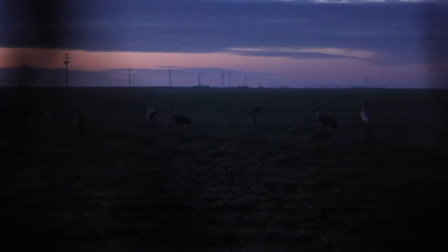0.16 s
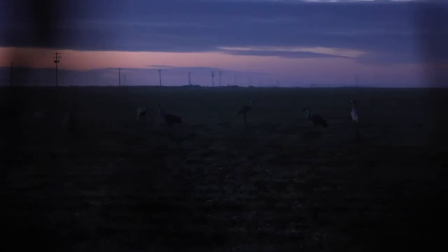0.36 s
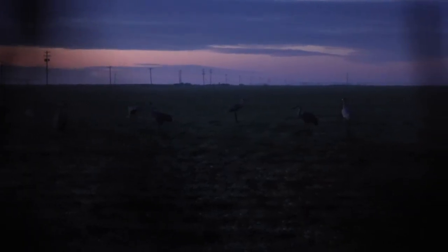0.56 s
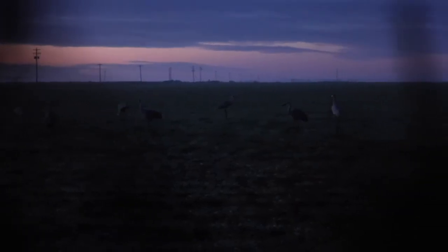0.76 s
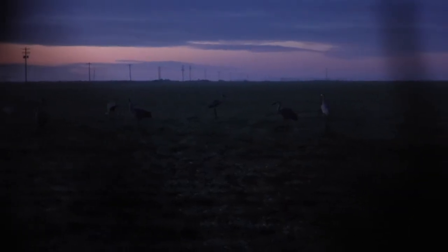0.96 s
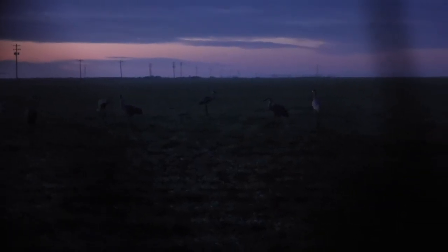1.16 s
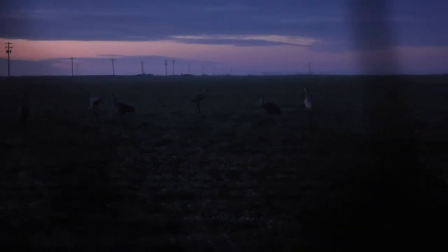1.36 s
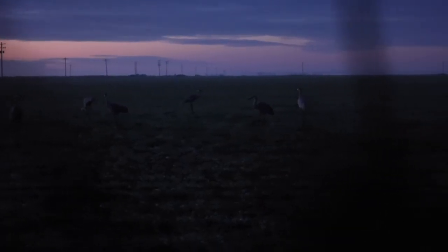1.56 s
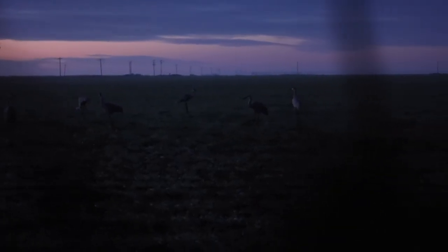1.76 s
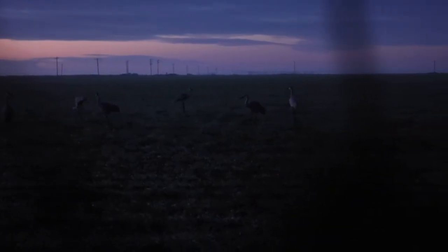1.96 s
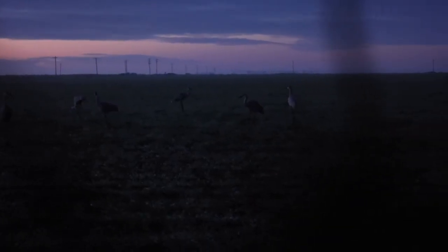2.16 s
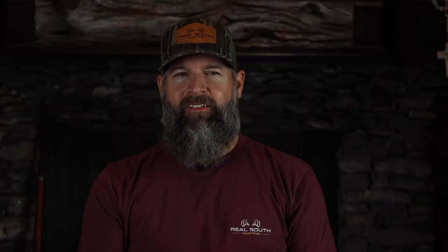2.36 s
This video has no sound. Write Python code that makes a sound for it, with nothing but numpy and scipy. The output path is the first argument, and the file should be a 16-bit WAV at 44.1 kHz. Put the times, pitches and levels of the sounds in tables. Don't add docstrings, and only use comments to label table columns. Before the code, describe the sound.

Cranes close by give short, reedy rattling calls in bursts over a quiet open field

```python
import sys
import numpy as np
from scipy import signal
from scipy.io import wavfile
from scipy.ndimage import uniform_filter1d, minimum_filter1d

SR = 44100
rng = np.random.default_rng(int(sys.argv[2]) if len(sys.argv) > 2 else 0)


def waveform_to_disk(signal):
    frames = np.transpose(np.atleast_2d(signal))
    scaled = np.clip(frames, -1, 1) * 32767
    samples = np.round(scaled).astype(np.int16)
    wavfile.write(sys.argv[1], SR, samples)


def voltage_ratio(decibels):
    exponent = np.asarray(decibels, float) / 20
    return 10 ** exponent


N = 105707
T = np.arange(N) / SR


def rms_one(x):
    return x / np.sqrt(np.mean(x ** 2) + 1e-20)


def white_noise():
    return rng.standard_normal(N)


def lowpass(x, order, hz):
    return signal.sosfilt(signal.butter(order, hz, fs=SR, output="sos"), x)


def curve(rows):
    s, db = np.transpose(rows)
    return voltage_ratio(np.interp(T, [s[0] - .03, *s, s[-1] + .03], [-110, *db, -110]))


def drift(rate_hz):
    r = np.exp(-2 * np.pi * rate_hz / SR)
    run_in = int(SR / rate_hz)
    wander = signal.lfilter([1], [1, -2 * r, r * r], rng.standard_normal(N + run_in))
    return rms_one(wander[run_in:])


def resonate(x, peaks, order=1):
    out = 0
    for k, (hz, width, db) in enumerate(peaks):
        r = np.exp(-np.pi * width / SR)
        top, bottom = [(1 - r * r) / 2, 0, (r * r - 1) / 2], [1, -2 * r * np.cos(2 * np.pi * hz / SR), r * r]
        y = x + 1e-18
        for _ in range(order):
            y = signal.lfilter(top, bottom, y)
        out = out + y * voltage_ratio(db) * (-1) ** k
    return out


# (time [s], length [s], first pitch [Hz], last pitch [Hz], level [dB])
PULSES = [(-.016, 0.016, 970, 790, -18.5), (0.0354, 0.024, 1061, 800, -23.5),
          (0.089, 0.018, 1063, 800, -18), (.786, 0.014, 824, 765, -19), (0.822, 0.028, 879.4, 780, -26),
          (0.877, 0.025, 856.8, 735, -26), (1.0839, 0.00938, 904, 790, -19), (1.653, 0.013, 773, 712, -21),
          (1.693, 0.018, 764.2, 713, -24), (1.8921, 0.0095, 874.4, 785, -18.5),
          (2.005, 0.018, 1000, 730, -14), (2.048, 0.013, 897, 812, -20.5),
          (2.091, 0.01782, 931.3, 745, -19.5), (2.136, 0.012, 640, 590, -31),
          (2.17, 0.014, 1029, 785, -18.5), (2.218, 0.017, 1058, 790, -20.5), (2.266, 0.019, 1161, 800, -20),
          (2.312, 0.018, 1089, 795, -18.5), (2.361, .020, 1039, 795, -23.5)]


def pulses():
    pulse = np.searchsorted(np.array(PULSES)[:, 0], T) - 1
    start, length, first_hz, last_hz, db = np.transpose(PULSES)[:, pulse]
    age = T - start
    return pulse, age, length, first_hz, last_hz, db, np.clip(age / length, 0, 1)


def breath(order, release_s=0.0028):
    _, age, length, _, _, db, done = pulses()
    late_s = .0016 * (np.sqrt(min(order, 5)) - 1)
    attack = np.clip((age - late_s) / 0.0028, 0, 1) ** 2
    release = np.exp(-np.clip(age - length, 0, 1) * np.sqrt(order) / release_s)
    return voltage_ratio(db - 4 * done) * attack * release


# (favoured pitch [Hz], boost [dB], hollow pitch [Hz], pitch hold [power],
# settling [power])
THROAT = [(2460, 9, 3200, 0.58, 1.6), (4340, 8.5, 3650, 2.1, 2.128), (4260, 14.5, 3460, 2.8, 2.353),
          (3383, 21.5, 3900, 1.416, 1.115), (3309, 15, 6366, 2.163, 1.153), (4210, 16, 3980, 5.15, 1.468),
          (4200, 15, 4200, 1.116, 2.01), (3560, 12.5, 3400, 1.024, 1.3), (3387, 15, 6900, 1.323, 1.634),
          (3360, 15, 2700, 1.184, 2.2), (3360, 11, 2280, 1.5, 1.303), (2532, 14, 3160, 1.124, 1.99),
          (3525, 14, 6060, 2.52, 1.264), (2260, 14.5, 6000, 1.025, 1.94), (2390, 6.5, 2570, 1.132, 3.05),
          (2789, 10, 2400, 2.3, 2.66), (3060, 7.5, 3550, 1.4, 2.1), (4600, -0.5, 3604, 1.2, 2.195),
          (3020, 8, 4040, 1.8, 2.09)]


def sagging_pitch():
    pulse, age, _, first_hz, last_hz, _, done = pulses()
    _, _, _, hold, settle = np.transpose(THROAT)[:, pulse]
    sag = (1 - done ** np.abs(hold)) ** np.abs(settle)
    scoop = 1 + .15 * np.exp(-np.abs(age) / .0015)
    return last_hz * (first_hz / last_hz) ** sag * scoop


# (from time [s], fundamental [dB], brass band [dB], top [dB], rasp [dB])
MANNER = [
    (-.1, -8, -3, -5, -9.5),
    (.75, -7.5, 4, -3, -9),
    (1.05, -1, -9, -4, -7.5),
    (1.6, -6, -3, -12, -26),
    (1.85, -3.5, -6, -6, -10),
    (1.98, -1.5, 2, -5.5, -4.5),
    (2.2, -2.5, -0.5, -2, -10.5),
]
BRASS_HZ, TOP_HZ = 3000, 4340


def manner():
    starts, *colours = np.transpose(MANNER)
    call = np.searchsorted(starts, T) - 1
    return call, *(colour[call] for colour in colours)


RASP_TOP_DB = [5.5, -4.5, 2.6, -8.5, -5.5, -1.17, 1.2]


def rasp(phase):
    *_, done = pulses()
    call, _, _, top_db, rasp_db = manner()
    chopped = white_noise() * (1 + np.cos(phase)) / 2
    noise = voltage_ratio(rasp_db + 8 * done + 9.5) * chopped * breath(order=3)
    dull = lowpass(noise, 4, TOP_HZ)
    return dull + (noise - dull) * voltage_ratio(top_db + np.array(RASP_TOP_DB)[call])


ORDER_DB = [6.5, 3.5, 0, -12.5, -1.5, 0]
# (second harmonic [dB], third harmonic [dB], change of low harmonics [dB],
# low puff [dB])
EFFORT = [(-8, -2, 3.5, 18), (-2.5, 1, -0.5, 2.7), (-2, 4, -3, -7), (3.4, -3.5, 1.8, -10),
          (0.3, -7.5, 1.7, -15), (2.5, 0.5, -2.5, -5), (4.5, 3.5, -6, 11), (2.5, 0.5, -3.5, -8),
          (8, 8.6, -12.5, -15), (-4, -2, -4.5, 3), (4, 2, -4.5, -2.5), (0.5, -10.3, -5, 6.5),
          (-2.5, 1, -1, 1.5), (8, 8, 0, 18), (3.9, 4.8, -6, 7.5), (1.5, 7.3, -2, 4.5), (0.6, -1.7, -2, 1.5),
          (-2, 1.5, -4, 1.5), (-4, -6, 1.5, 3)]


def reed_harmonics(pitch, phase):
    pulse, *_, done = pulses()
    _, low_db, brass_db, top_db, _ = manner()
    mouth_hz, mouth_db, hollow_hz, _, _ = np.transpose(THROAT)[:, pulse]
    second_db, third_db, fade_db, _ = np.transpose(EFFORT)[:, pulse]
    out = 0
    for k, order_db in enumerate(ORDER_DB + [0] * 12, start=1):
        hz = k * pitch
        above_brass = 1 / (1 + (BRASS_HZ / hz) ** 20)
        above_top = 1 / (1 + (TOP_HZ / hz) ** 20)
        colour_db = order_db - 3 * np.log2(k)
        colour_db = colour_db + (above_brass - above_top) * brass_db + above_top * top_db
        colour_db += 1.1 * np.sqrt(k) * drift(47.3)
        colour_db += mouth_db * np.exp(-((hz - mouth_hz) / 300) ** 2)
        colour_db += -11.5 * np.exp(-((hz - hollow_hz) / 440) ** 2)
        colour_db += (k == 1) * low_db + (k == 2) * second_db + (k == 3) * third_db
        colour_db += np.where(k < 4, fade_db, (k > 6) * -4) * done
        out = out + np.cos(k * phase + .5 * k * k) * voltage_ratio(colour_db) * breath(order=k)
    return out


# (pitch [Hz], level [dB])
PIPE = [(640, -29), (810, -11), (1590, 1.5), (2030, 1), (2430, 4), (2980, 4.5), (3550, 5.5), (3980, 1.5),
        (4380, 3.5), (4850, 0.5), (6000, -8), (9000, -14), (12000, -24)]
PIPE_WIDTH_HZ = [110, 130, 170, 130, 110, 120, 120, 100, 150, 300, 900, 1300, 4000]
# (pitch [Hz], width [Hz], level [dB])
RING = [(645, 22, -21), (1589, 58, -13.5), (2370, 26, -36), (3645, 38, -8), (4100, 73, -14)]


def windpipe(source):
    voice = resonate(source, [(hz, width, db) for (hz, db), width in zip(PIPE, PIPE_WIDTH_HZ)])
    return voice + resonate(voice, RING)


def low_puff():
    pulse, _, _, first_hz, last_hz, _, _ = pulses()
    puff_db = np.transpose(EFFORT)[3, pulse]
    glide_db = 37 * np.abs(np.log2(first_hz / last_hz))
    strength = uniform_filter1d(breath(order=1) * voltage_ratio(puff_db + glide_db), size=300)
    return voltage_ratio(-76 + 28.5) * strength * rms_one(lowpass(white_noise(), 2, 106))


# (pitch [Hz], width [Hz], level [dB])
SIGH = [(4370, 650, -7.5), (3040, 435, 0.5), (4250, 356, 0), (665, 89, 6.5)]


def sigh():
    *_, done = pulses()
    strength = done ** 2 * breath(order=1, release_s=.007)
    return voltage_ratio(-14) * strength * rms_one(resonate(white_noise(), SIGH))


# (pitch [Hz], width [Hz], level [dB])
LEAD = [(2710, 110, -8), (616, 47, 0), (4300, 200, -18), (9200, 320, -29)]
LEAD_S = 0.0043


def leading_hiss():
    strength = np.zeros(N)
    for s, _, _, _, db in PULSES:
        strength += voltage_ratio(db) * np.exp(-((T - s + LEAD_S) / (2.86 * LEAD_S)) ** 2)
    return voltage_ratio(-38) * strength * rms_one(resonate(white_noise(), LEAD))


def cranes():
    pitch = sagging_pitch()
    phase = 2 * np.pi * np.cumsum(pitch * (1 + .006 * drift(152.3))) / SR
    voice = windpipe(rasp(phase) + reed_harmonics(pitch, phase))
    return voice + low_puff() + sigh() + leading_hiss()


# (time [s], length [s], pitch [Hz], level [dB])
HOOTS = [(0.917, 0.043, 630, -65), (1.0815, 0.0081, 620, -48.5), (1.105, 0.038, 593, -65),
         (1.570, 0.017, 623, -58.5), (1.888, 0.0073, 603, -39), (0.45, 0.062, 1048, -75.5),
         (2.135, 0.011, 590.2, -44), (1.2, 0.013, 560, -75)]


def hoots():
    out = np.zeros(N)
    for s, length, hz, db in HOOTS:
        age = (T - s) / length
        bend_s = 0.022 * length * np.sin(2 * np.pi * (age - .5)) / (2 * np.pi)
        phase = 2 * np.pi * hz * (T - s + bend_s)
        shape = np.sin(np.pi * np.clip(age * 0.7 + 0.16, 0, 1)) ** 2
        overtones = np.sin(2 * phase) + np.sin(3 * phase + 1)
        out += voltage_ratio(db + 12.5) * shape * (np.sin(phase) + voltage_ratio(-18) * overtones)
    return out * (1 + .15 * drift(119.0))


# (time [s], level [dB])
TICKS = [
    (0.283, -62),
    (0.455, -60),
    (0.5469, -46),
    (0.7061, -54),
    (1.0104, -22),
    (1.5767, -49),
]
# (pitch [Hz], width [Hz], level [dB])
TICK = [(2290, 620, -2.2), (3300, 1120, 2.5), (4700, 1600, -3), (5650, 680, -5.5), (1560, 700, -36),
        (376, 280, -14.5), (9800, 4200, -29.5)]


def ticks():
    burst = np.zeros(N)
    for s, db in TICKS:
        fall = voltage_ratio(-60 * np.clip(T - s, 0, 1) / .017)
        burst += voltage_ratio(db + 9.5) * (T > s) * fall
    return resonate(burst * white_noise(), TICK)


def blind(x):
    t = np.arange(int(.15 * SR)) / SR
    tail = rng.standard_normal(len(t)) * voltage_ratio(-60 * t / 0.096) * (t > .002)
    tail = lowpass(tail, 2, 1760)
    return x + voltage_ratio(-37) * signal.fftconvolve(x, tail / np.sqrt(np.sum(tail ** 2)))[:N]


def thin_air(flow, peaks, throb_db):
    return curve(flow) * voltage_ratio(throb_db * drift(47)) * rms_one(resonate(white_noise(), peaks, order=2))


# (time [s], level [dB])
WHISTLE_FLOW = [(.92, -75), (.99, -69), (1.04, -59), (1.1, -77), (1.15, -62.5), (1.24, -53.5), (1.3, -65),
                (1.34, -88)]
# (pitch [Hz], width [Hz], level [dB])
WHISTLE = [(3016, 255, 7.5), (1566, 310, -4), (8580, 400, -19), (10900, 280, -23)]


def whistle():
    return thin_air(WHISTLE_FLOW, WHISTLE, throb_db=2.0)


# (time [s], level [dB])
LEAK_FLOW = [(1.45, -125), (1.57, -63), (1.64, -68), (1.75, -71.5), (1.83, -67.5), (1.885, -50.5)]
# (pitch [Hz], width [Hz], level [dB])
LEAK = [(4000, 1000, -9), (8900, 670, -22.5), (11675, 770, -25.5), (640, 29, 5), (1590, 130, -2.5),
        (3010, 540, -13)]


def leak():
    return voltage_ratio(-0.5) * thin_air(LEAK_FLOW, LEAK, throb_db=4.0)


# (time [s], length [s], pitch [Hz], level [dB])
BUMPS = [(0.707, 0.042, 280, -59.5), (1.19, 0.13, 210, -64.5), (1.562, 0.039, 336, -56),
         (0.022, 0.06, 350, -61.5), (.79, .12, 290, -69.5), (1.003, .025, 350, -58.5),
         (0.45, 0.12, 750, -73), (0.42, 0.076, 76, -79), (0.49, 0.021, 910, -63.5), (1.57, 0.023, 352, -59),
         (1.755, .1, 450, -73.5), (0.97, 0.09, 780, -65.5), (1.08, 0.02, 123, -59.5),
         (1.886, 0.02012, 240, -61.5)]


def bumps():
    out, white = np.zeros(N), white_noise()
    for s, length, hz, db in BUMPS:
        shape = np.sin(np.pi * np.clip((T - s) / length, 0, 1))
        out += voltage_ratio(db + 1.5) * shape * rms_one(resonate(white, [(hz, 0.7 * hz, 0)], order=2))
    return out


# (time [s], level [dB])
CHIRPS = [
    (1.357, -70.5),
    (1.397, -73),
    (1.442, -78),
]


def insect():
    shrill = rms_one(resonate(white_noise(), [(6400, 300, 0)], order=2))
    return shrill * sum(voltage_ratio(db) * np.exp(-((T - s) / 0.015 * 2) ** 2) for s, db in CHIRPS)


def banded_noise(spectrum, patchy_db):
    out, together, white = 0, drift(7.9), rng.standard_normal((2, N))
    hz, db = np.transpose(spectrum)
    edges = 20 * 2 ** np.arange(0, 9.9, .5)
    for k, (low, high) in enumerate(zip(edges, edges[1:])):
        band = signal.sosfilt(signal.butter(2, [low, high], "band", fs=SR, output="sos"), white[k % 2])
        middle = np.log(low * high) / 2
        level_db = np.interp(middle, np.log(hz), db, left=-60, right=db[-1] - 18)
        out = out + band * voltage_ratio(level_db + patchy_db * (together + drift(14.95)))
    return rms_one(out)


# (time [s], level [dB])
RUSTLE_FLOW = [(0, -93), (.15, -74.5), (.27, -66), (.46, -59.5), (.68, -61.5), (.9, -72.5), (1.05, -55),
               (1.14, -72.5), (1.24, -63), (1.36, -66), (1.6, -69), (1.74, -72.5), (1.88, -61), (1.96, -74),
               (2.05, -84), (2.4, -57.5)]
# (pitch [Hz], level [dB per Hz])
RUSTLE = [(300, -51), (700, -9.5), (1350, -15.5), (2750, -2.5), (4500, -7.5), (6500, -18), (10000, -24),
          (16000, -30)]


def rustle():
    return curve(RUSTLE_FLOW) * banded_noise(RUSTLE, patchy_db=1.2)


# (pitch [Hz], level [dB per Hz])
FIELD = [(20, 13.5), (60, -5.5), (150, -1), (350, -2.5), (700, -5.5), (1500, -6.5), (3000, -55)]


def field():
    swing = (curve(RUSTLE_FLOW) / voltage_ratio(-63.5)) ** 0.74
    return voltage_ratio(-74) * swing * banded_noise(FIELD, patchy_db=0.0)


def scene():
    near = blind(cranes() + hoots() + ticks())
    air = whistle() + leak()
    ground = rustle() + field()
    return (near + air + bumps() + insect() + ground)[None]


def roll_off(x):
    return signal.sosfilt(signal.butter(12, 16160, fs=SR, output="sos"), x)


def record(dry):
    limit, release_s = 0.1, 0.013
    over_db = np.maximum(20 * np.log10(np.abs(dry[0]) / limit + 1e-9), 0)
    held_db = -minimum_filter1d(-over_db, size=90)
    r = np.exp(-1 / (release_s * SR))
    held_db = np.maximum(held_db, signal.lfilter([1 - r], [1, -r], held_db))
    x = dry * voltage_ratio(-uniform_filter1d(held_db, size=60))
    x = signal.sosfilt(signal.cheby2(12, 70, 16400, fs=SR, output="sos"), x)
    return roll_off(x)


dry = scene()
out = record(dry)
waveform_to_disk(out)
```